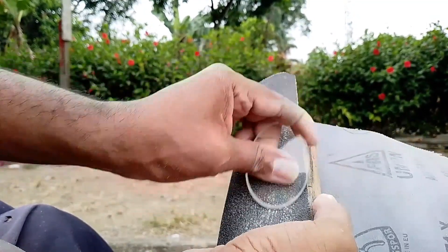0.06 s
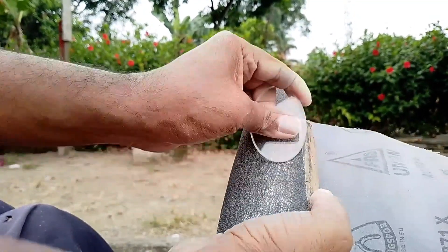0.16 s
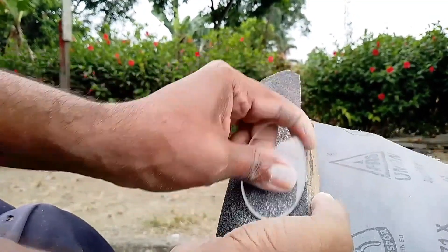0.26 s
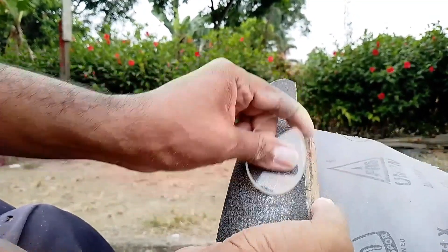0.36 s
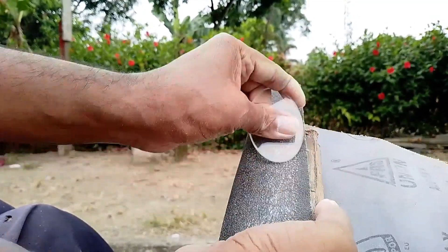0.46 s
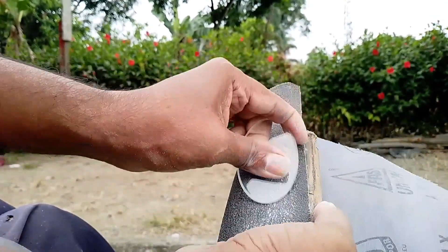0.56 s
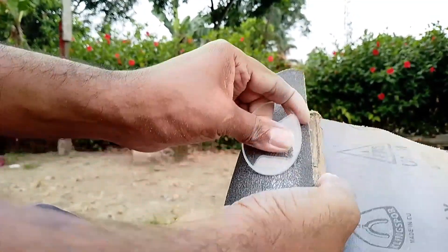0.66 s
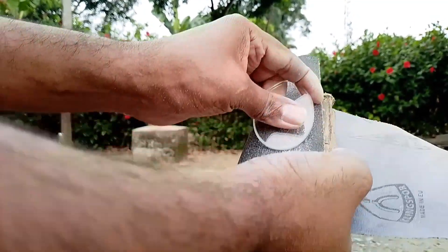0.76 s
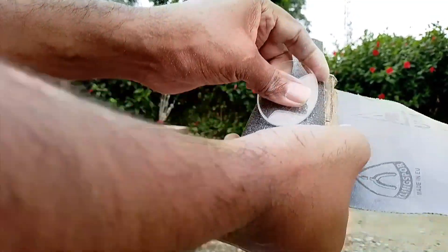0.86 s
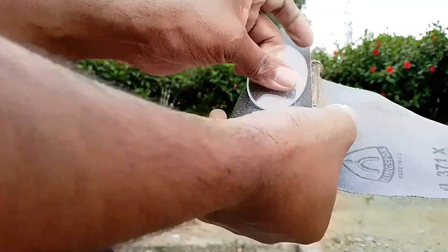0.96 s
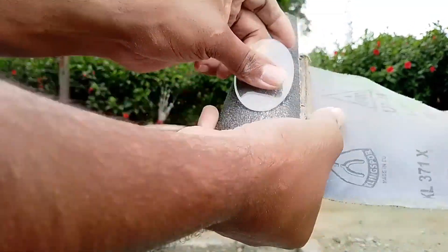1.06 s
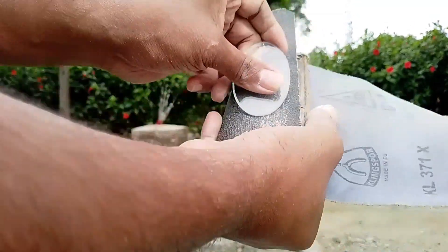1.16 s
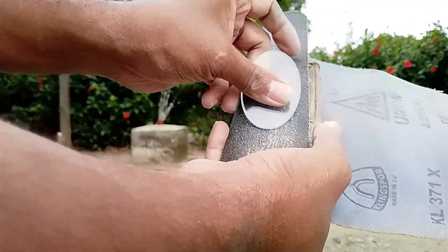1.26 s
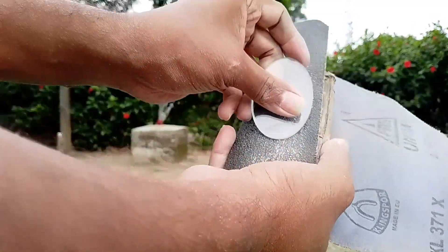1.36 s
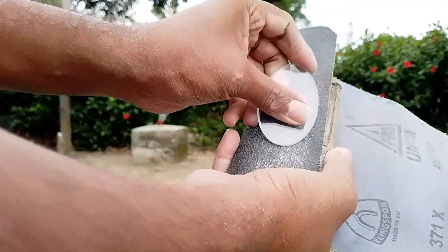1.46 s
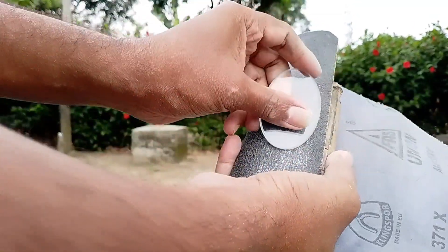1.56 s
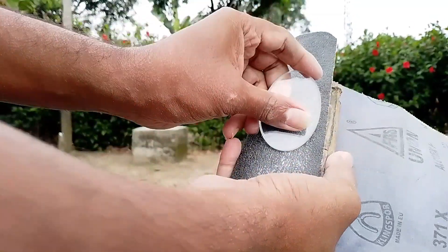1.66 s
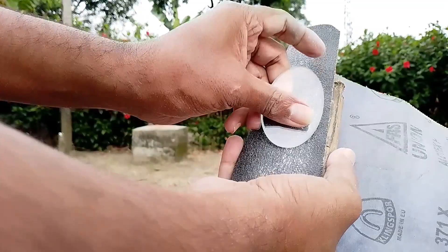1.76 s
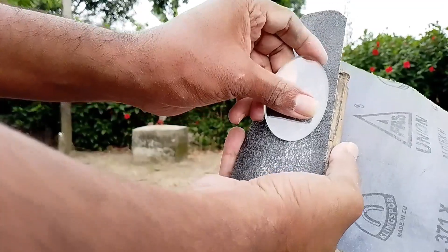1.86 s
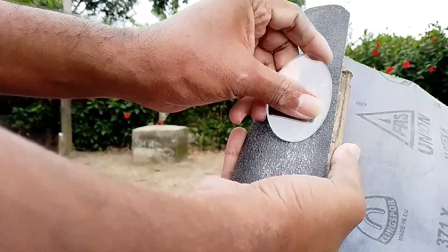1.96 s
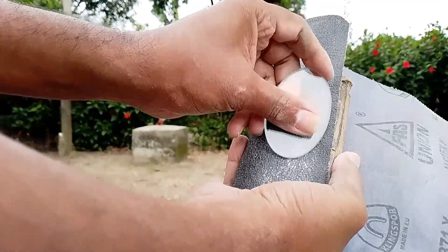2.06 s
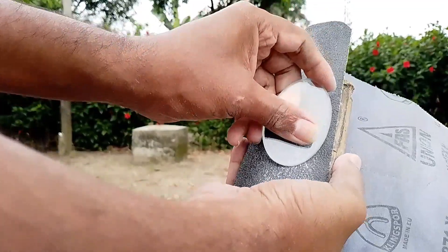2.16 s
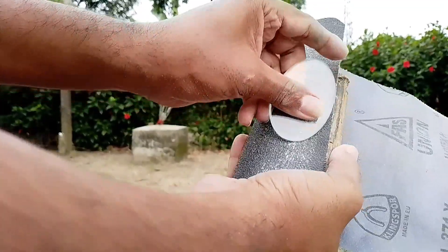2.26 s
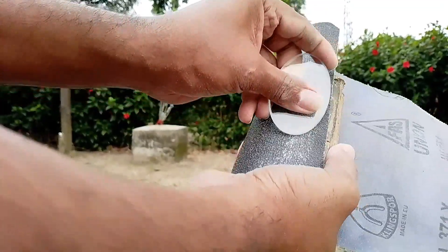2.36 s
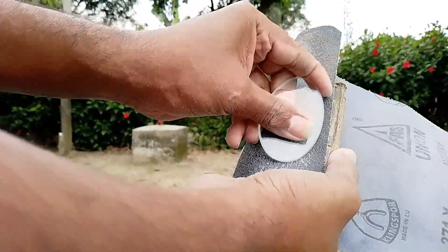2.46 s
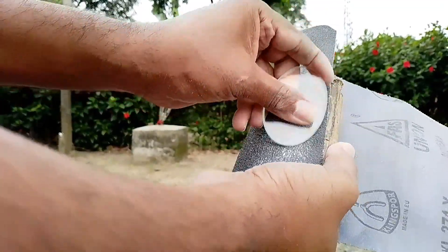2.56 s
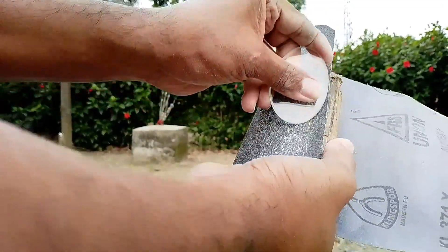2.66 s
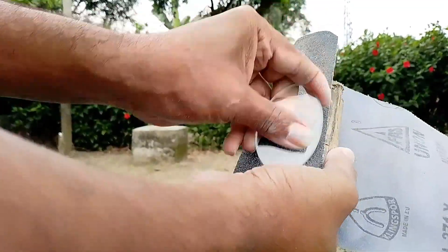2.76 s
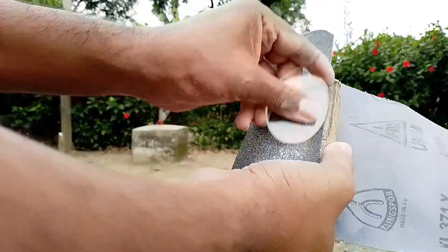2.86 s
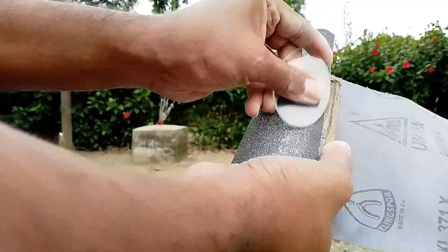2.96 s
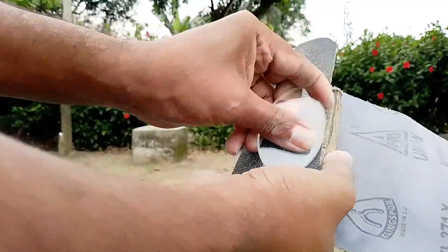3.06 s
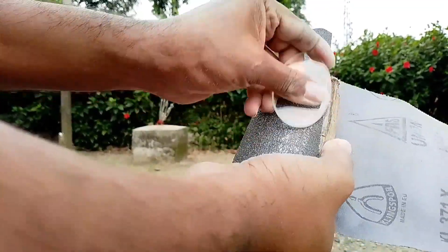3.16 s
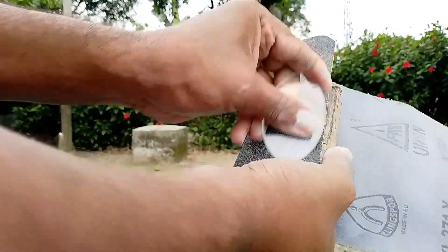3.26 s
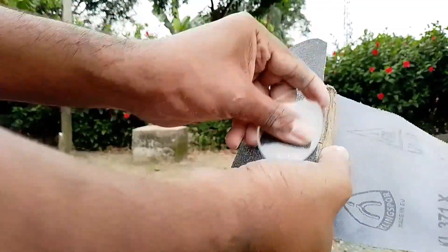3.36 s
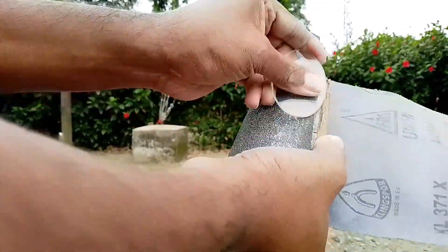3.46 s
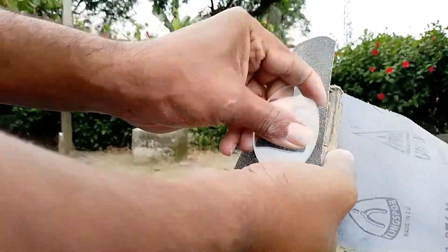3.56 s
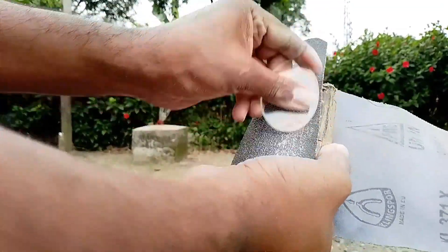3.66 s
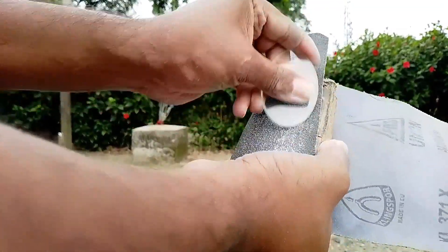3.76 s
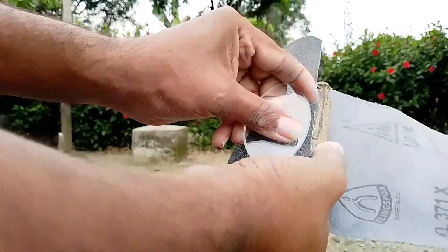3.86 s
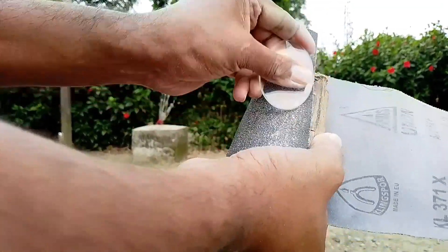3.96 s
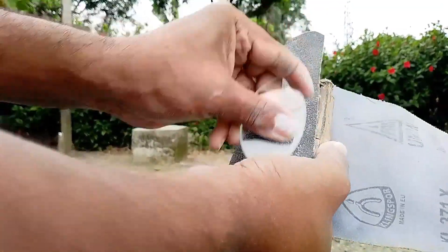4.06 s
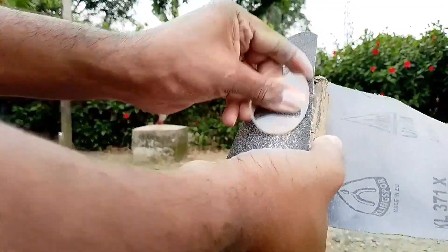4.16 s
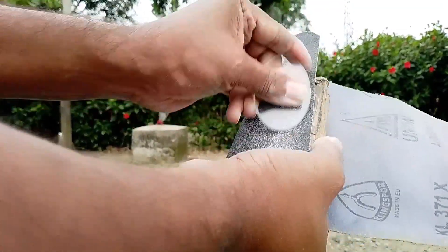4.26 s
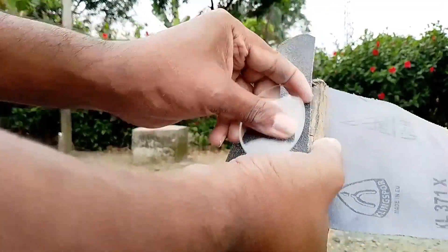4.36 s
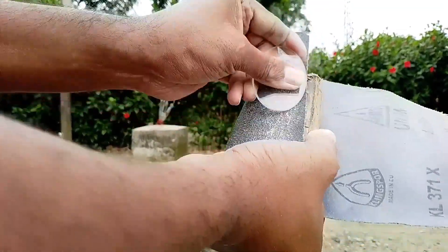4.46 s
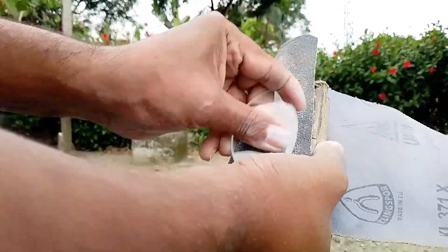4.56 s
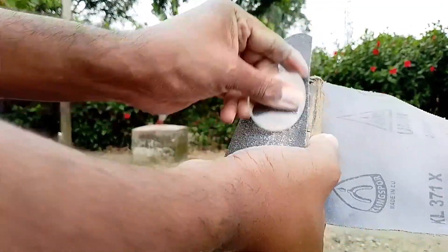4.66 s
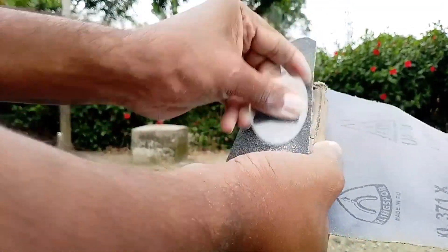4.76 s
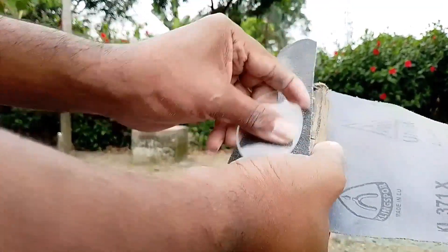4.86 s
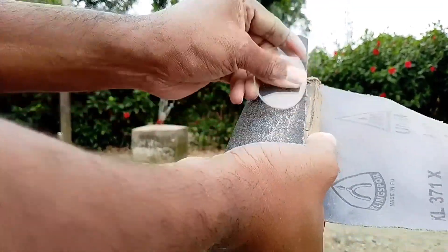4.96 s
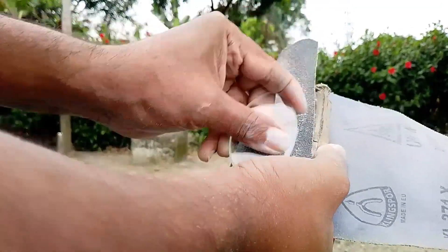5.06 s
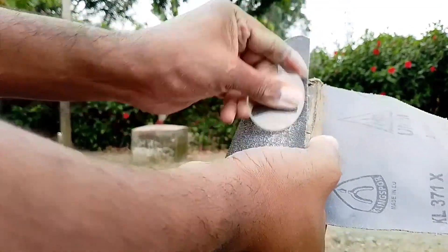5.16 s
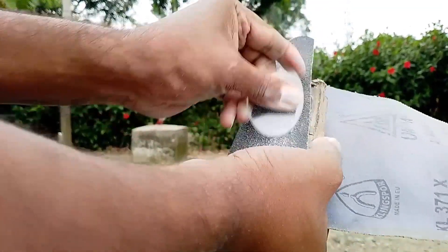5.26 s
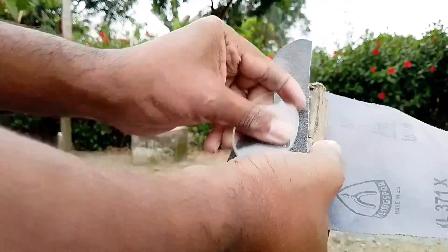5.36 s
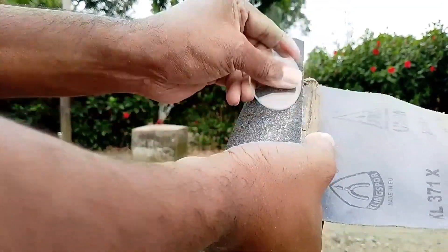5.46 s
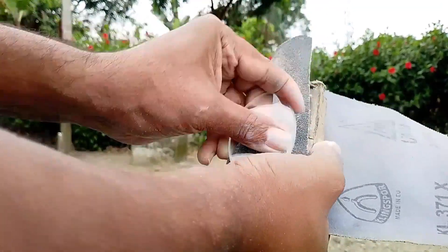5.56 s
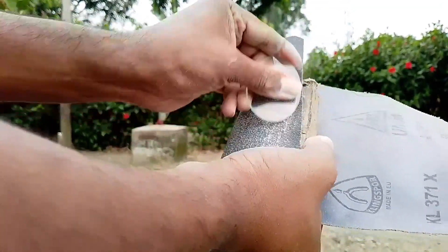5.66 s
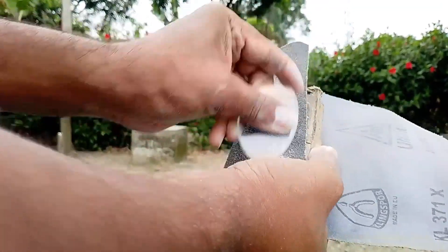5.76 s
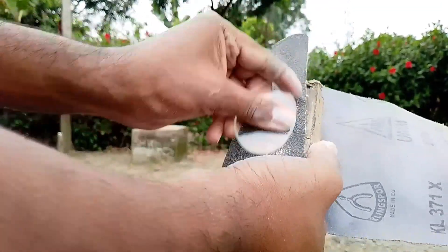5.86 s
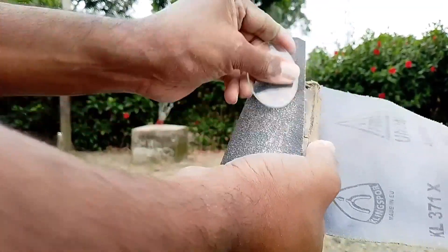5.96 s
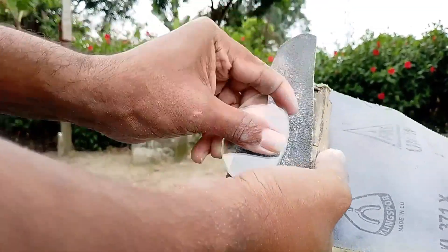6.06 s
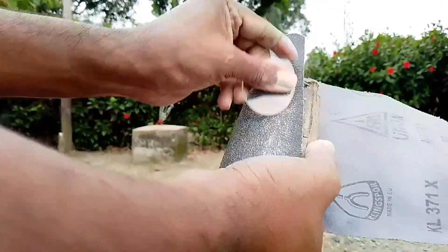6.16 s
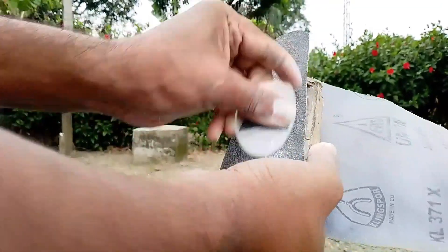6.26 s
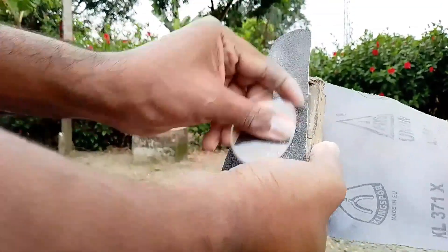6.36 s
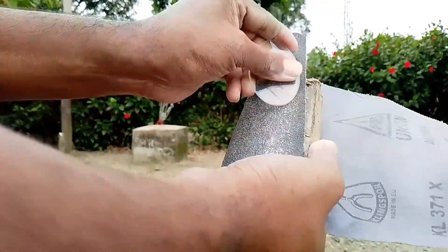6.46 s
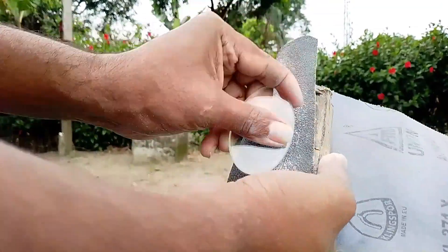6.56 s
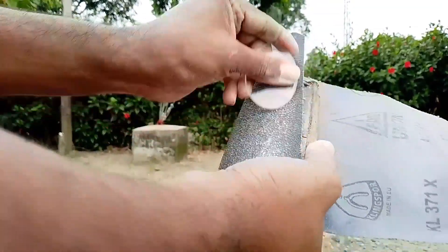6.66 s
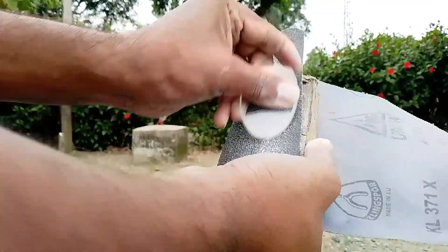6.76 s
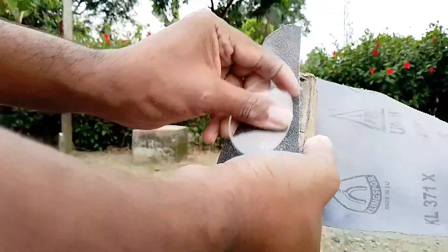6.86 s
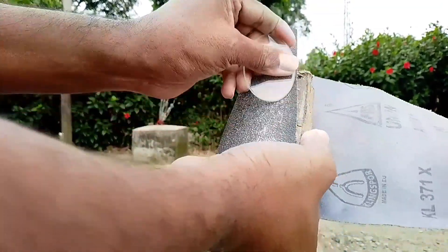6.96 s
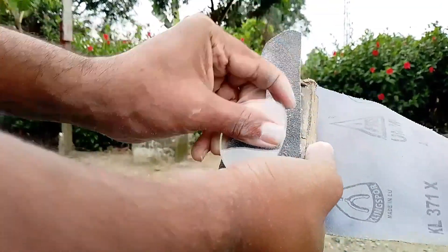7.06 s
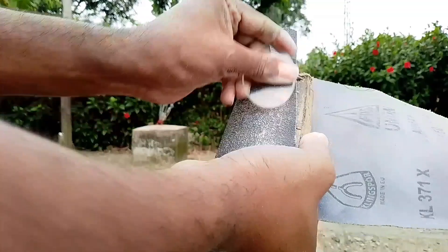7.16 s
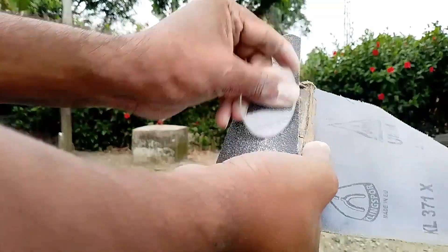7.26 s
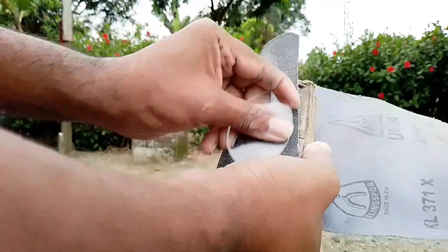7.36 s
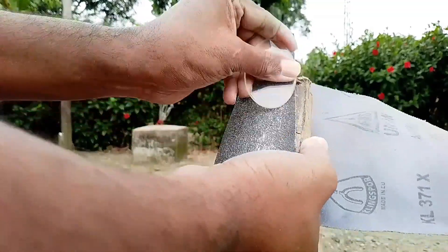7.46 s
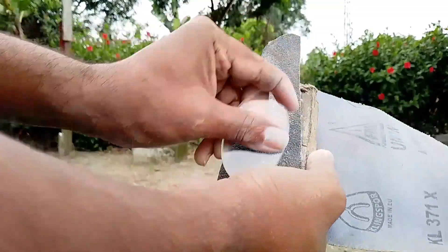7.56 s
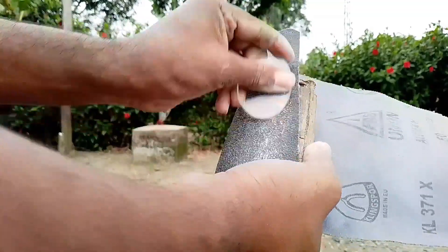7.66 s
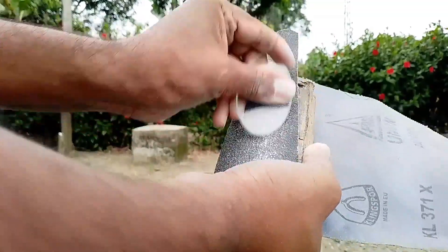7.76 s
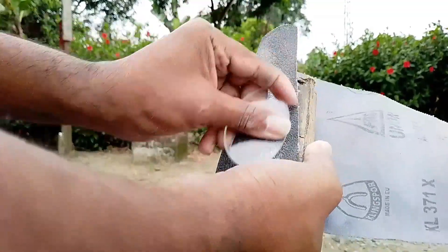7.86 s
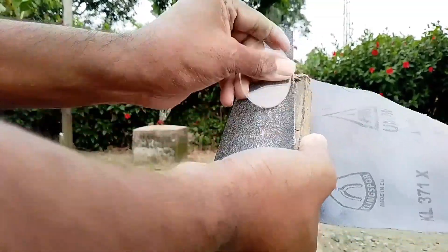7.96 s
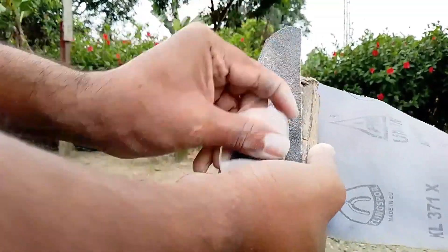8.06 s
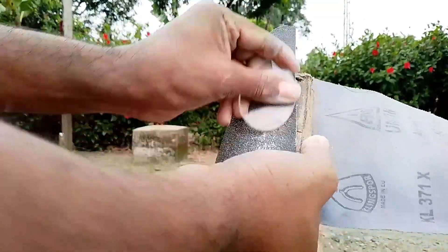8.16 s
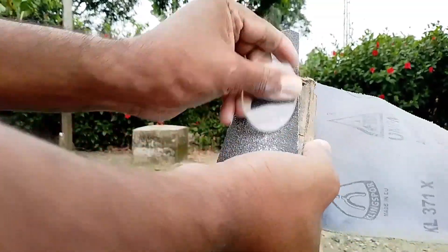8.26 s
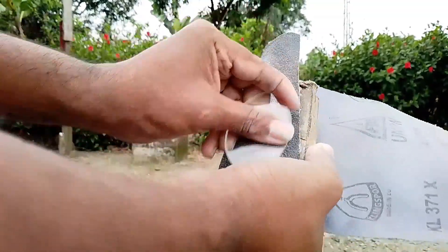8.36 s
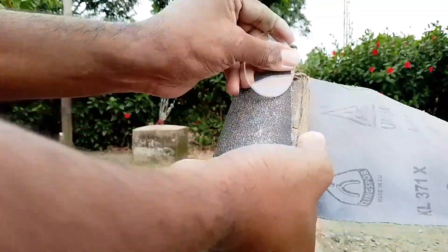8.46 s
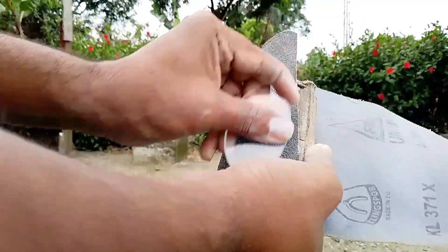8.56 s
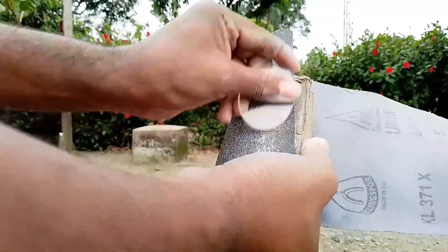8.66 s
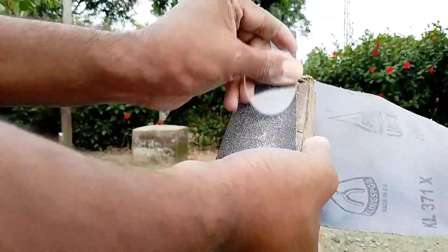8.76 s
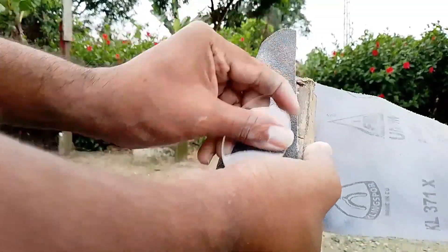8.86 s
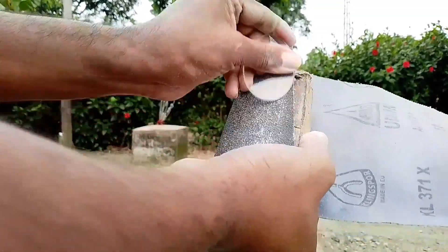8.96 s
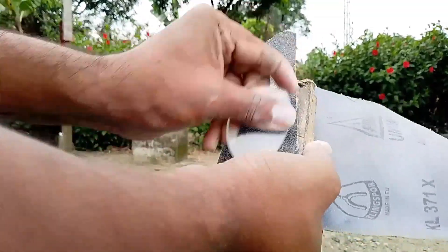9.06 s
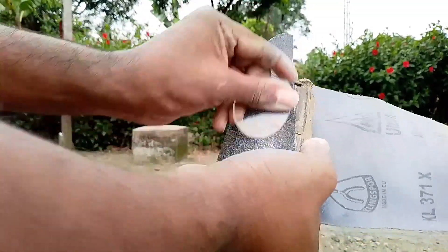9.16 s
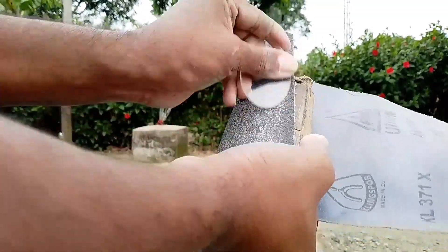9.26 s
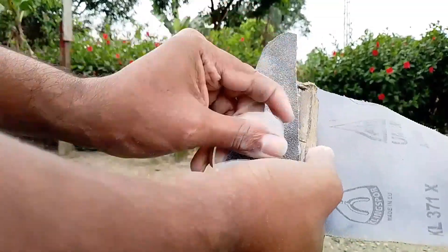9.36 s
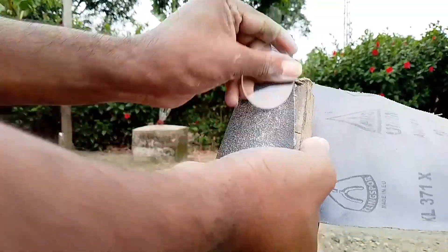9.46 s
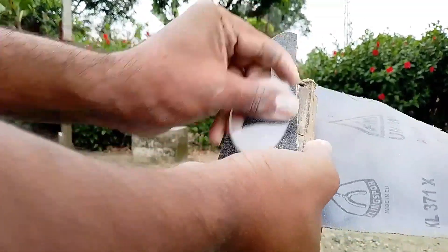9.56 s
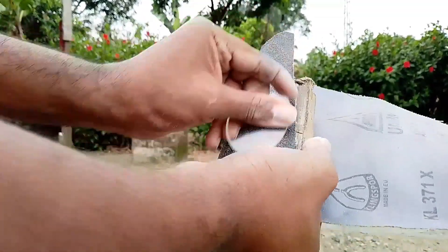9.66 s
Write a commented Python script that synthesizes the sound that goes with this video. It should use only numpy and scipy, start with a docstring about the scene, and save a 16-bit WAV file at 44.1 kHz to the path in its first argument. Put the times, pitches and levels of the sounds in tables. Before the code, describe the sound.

Outdoors, very close and dry. From 0 to about 0.63 s, a small glass disc makes five short gritty strokes on coarse sandpaper, each a dense rasp of roughly a tenth of a second, strongest in the mid and upper-mid range, with small gaps between. From 0.65 to 2.1 s the hand rests: faint scuffs of the disc, a soft low bump near 1.6 s, a light wind flutter, and distant birds with gliding whistles and a repeated fuzzy trilled note, lasting until about 2.8 s. Rubbing resumes weakly at 2.1 s, gains force by 2.75 s, then settles into quick, even to-and-fro strokes, about eight per second, with occasional dull grit snaps. The tone slowly brightens, while the level eases slightly towards the last stroke at 9.66 s and a tiny final touch. A low rumble, faint hum and thin high insect buzz lie underneath.

```python
"""A small glass disc is rubbed to and fro on coarse sandpaper on a wooden block, outdoors, near a phone.
From the start, grit clicks on the glass by the thousand and rings the resonances of disc, paper and block;
shaped noise makes the insect, light wind, low rumble and hum of the yard underneath.
After five strokes the hand rests: light touches of the disc are heard, a finger bump as a short low pulse,
and far birds as gliding or trilled sine tones. Then quick, even rubbing returns and lasts nearly to the end."""
import sys
import numpy as np
from scipy import signal
from scipy.fft import rfft, irfft
from scipy.io import wavfile
from scipy.ndimage import uniform_filter1d

SR = 44100
rng = np.random.default_rng(int(sys.argv[2]) if len(sys.argv) > 2 else 0)


def elevation(decibels):
    """Turn decibel levels (scalar or array-like) into linear amplitude ratios."""
    levels = np.asarray(decibels, float)
    return 10 ** (levels / 20)


def pcm_store(signal):
    """Save signal as 16-bit PCM."""
    levels = np.round(np.clip(np.atleast_2d(signal), -1, 1) * 32767)
    wavfile.write(sys.argv[1], SR, levels.astype(np.int16).T)


N = 427769
T = np.arange(N) / SR  # time in s


def evened(x):
    """Power normalisation: scales to rms 1."""
    return x / np.sqrt(np.mean(x ** 2) + 1e-20)


def ring(x, hz, width):
    """Resonance: a two-pole band-pass of peak gain 1, applied twice for steep skirts."""
    r = np.exp(-np.pi * width / SR)
    poles = [1, -2 * r * np.cos(2 * np.pi * hz / SR), r * r]
    zeros = (1 - r * r) / 2 * np.array([1, 0, -1])
    once = signal.lfilter(zeros, poles, x)
    return signal.lfilter(zeros, poles, once)


def drift(seconds):
    """Random modulation: smoothed noise of rms about 1 that wanders over the given time."""
    step = max(round(seconds * SR / 8), 1)
    rough = rng.standard_normal(N // step + 2)
    smooth = evened(uniform_filter1d(uniform_filter1d(rough, size=8), size=8))
    return np.interp(T, np.arange(len(rough)) * step / SR, smooth)


def coloured(points):
    """Spectral shaping: white noise weighted by (hz, relative db) points, then set to rms 1."""
    hz, db = np.transpose(points)
    f = np.fft.rfftfreq(N, 1 / SR)
    gain = elevation(np.interp(np.log(f + 1), np.log(hz + 1), db))
    return evened(irfft(rfft(rng.standard_normal(N)) * gain, N))


def nearby(x, level_db=-21, t60=0.07):
    """Diffuse reflection: scatter off ground and hedge as an exponentially decaying noise tail."""
    t = np.arange(round(.4 * SR)) / SR
    tail = ring(rng.standard_normal(len(t)), 2200, 11500) * elevation(-60 * t / t60) * (t > .003)
    return x + elevation(level_db) * signal.oaconvolve(x, tail / np.linalg.norm(tail))[:N]


# Strokes of the hand in two bouts; each bout begins with a pull, then push and pull alternate.
# start_s, length_s, pressure_db, lean_db (rise of pressure through the stroke),
# thumb_db (scales the lift of the low modes)
STROKE_TABLE = [(0.0, 0.055, -36, 3, 0.5), (0.097, 0.12, -36.5, -3, 0.0), (0.258, 0.096, -36.5, 1.5, 1.5),
                (0.387, 0.12, -37.5, 0.5, 1.5), (0.536, 0.095, -40.5, -1, 2), (2.091, 0.087, -44.5, 1.5, 2),
                (2.262, 0.11, -43.5, 0, 3), (2.448, 0.089, -41.5, -3, 3), (2.594, 0.11, -43, -7.5, 2),
                (2.75, 0.087, -37, 6.5, 2.0), (2.883, 0.095, -36.5, -3, 2), (3.013, 0.081, -34.5, 5.5, 3),
                (3.14, 0.1, -39.0, 4.5, 2.5), (3.286, 0.079, -36.5, -3.5, 2.5),
                (3.412, 0.1, -35.5, -4, 2.5), (3.546, 0.1, -37.5, -5, 2.5), (3.647, 0.12, -38.5, -0.5, 0.5),
                (3.803, 0.088, -35.5, 3, 0.5), (3.934, 0.097, -37.5, -1, 1.5),
                (4.06, 0.084, -37, -0.5, 1.5), (4.171, 0.098, -36.5, 4, -1), (4.303, 0.083, -38, -0.5, 1),
                (4.419, 0.099, -38, 4, 1.5), (4.548, 0.084, -38, 3.5, 1), (4.668, 0.095, -37, -1, 0.5),
                (4.791, 0.092, -37.5, -3, 2), (4.91, 0.11, -37, -1.5, -0.5), (5.04, 0.09, -36.5, 3.5, 0.5),
                (5.167, 0.1, -36.5, -2, 1), (5.29, 0.091, -38, 2.5, 0), (5.411, 0.098, -37.5, 2.5, 0),
                (5.535, 0.089, -38, 6, 0.5), (5.648, 0.1, -38.0, 2.5, 0), (5.775, 0.091, -38, 4, -1.0),
                (5.894, 0.1, -37, 2, 0.0), (6.019, 0.1, -38, 3.5, 0), (6.15, 0.1, -37, -5.5, -0.5),
                (6.271, 0.098, -37, 6, 1), (6.398, 0.11, -36, -2, 0), (6.527, 0.096, -37.5, 3.5, 0),
                (6.649, 0.1, -37.5, -1.5, -1), (6.774, 0.099, -37, -1.5, 0.5),
                (6.903, 0.11, -38.5, 0.5, -1), (7.032, 0.096, -39.5, 3, 1.5), (7.154, 0.11, -37, 4.5, -1.0),
                (7.278, 0.099, -37.5, 0, -0.5), (7.412, 0.11, -40, -2, 0), (7.547, 0.087, -38.5, 0, 0.5),
                (7.654, 0.11, -39, 2, 0), (7.781, 0.098, -37.5, 2.5, -1), (7.909, 0.1, -38.5, 1, 0),
                (8.034, 0.096, -38.5, 8, 0), (8.156, 0.11, -39, 5, 1.5), (8.293, 0.093, -39, 4, -0.5),
                (8.412, 0.106, -38.5, 5.5, -0.5), (8.543, 0.099, -39, 0.5, 0.5),
                (8.666, 0.11, -39.5, 3.5, 1), (8.797, 0.099, -38.5, 3, 1), (8.922, 0.11, -41, 0.5, 1.5),
                (9.057, 0.091, -39.5, -1.5, 0), (9.177, 0.1, -39.5, 6, 0), (9.307, 0.1, -39, 2.5, 1.5),
                (9.434, 0.11, -39, 1.5, 0), (9.565, 0.096, -39.5, 0.5, 0.5)]


def strokes():
    """Sliding friction: pressure as a gain, thumb and push in dB, place on the paper and share done (0-1)."""
    pause_s = .5  # a longer time between starts begins a new bout
    edge_db, edge_s = 7, 0.018  # the disc is slow at both ends: the rasp is down so far, fills in so fast
    catch_db, catch_s = 7.5, 0.0027  # the rim breaks loose, and stops, within a moment
    stick_db_per_s = 2598  # outside the stroke the glass sticks
    creep_db, creep_db_per_s, ragged_db = -31.5, 482, 5  # a faint, ragged creep is left
    push_grip_db, uneven_db = 0.35, 0.64  # pushes ring more in the middle; pressure wavers
    press, thumb_db, push_db, done = np.zeros((4, N))
    ragged = ragged_db * drift(0.0041)
    place, pull, last = np.full(N, .5), True, 0
    for start, length, db, lean_db, thumb in STROKE_TABLE:
        pull = start - last > pause_s or pull
        on = slice(max(round((start - .03) * SR), 0), round((start + length + .04) * SR))
        share = np.clip((T[on] - start) / length, 0, 1)
        from_start = T[on] - start if start else np.inf  # a stroke at 0 is already under way
        inside = np.minimum(from_start, start + length - T[on])  # s from the nearer end
        within, outside = np.maximum(inside, 0), np.maximum(-inside, 0)
        loss_db = edge_db * np.exp(-within / edge_s) + catch_db * np.exp(-within / catch_s)
        slide = elevation(-(loss_db + stick_db_per_s * outside))
        creep = elevation(creep_db - creep_db_per_s * outside + ragged[on])
        press[on] += elevation(db + lean_db * (share - .5)) * (slide + creep)
        thumb_db[on], done[on] = thumb, share
        push_db[on] = 0 if pull else push_grip_db
        place[on] = .5 - .5 * np.cos(np.pi * (share if pull else 1 - share))
        pull, last = not pull, start
    return press * elevation(uneven_db * drift(.02)), thumb_db, push_db, place, done


# The slowly changing hold.
# time_s, tilt_db (up lifts most modes from 2.7 kHz and thins those near 1 kHz),
# grip_db (lift of the middle modes),
# sweep_db (loss of the low modes from one end of the paper to the other); each mode scales these
HOLD_TABLE = [(0, -8, -1.5, 2.5), (.7, -4.5, -2, 2), (1.3, -16, -4, 0.1), (2, -11.5, 1.5, -0.5),
              (2.8, -6.5, 1.2, 8), (3.6, -6.5, 1.1, 4), (4.5, -4, 1.67, 7), (5.5, -3.5, 1.5, 6),
              (6.5, -3, 1, 0.5), (7.5, -2, 0, 3.5), (8.3, -1, 0.35, 7), (9, 0, 0, 4.5), (9.7, 0, -1.2, 4.5)]


def hand():
    """Contact mechanics: pressure gain, the hold's thumb, grip and tilt in dB, place and share done (0-1)."""
    grip_top, grip_bend_db = .42, 7  # middle modes ring most at this place (0-1), drop away from it
    press, thumb_db, push_db, place, done = strokes()
    nudges(press, thumb_db)
    lift_offs(press)
    s, *columns = np.transpose(HOLD_TABLE)
    tilt_db, grip_db, sweep_db = (np.interp(T, s, column) for column in columns)
    thumb_db = thumb_db - sweep_db * (place - .5)
    grip_db = grip_db + push_db - grip_bend_db * (place - grip_top) ** 2
    return press, thumb_db, grip_db, tilt_db, place, done


def palm(x, place, echo_db=-12, near_ms=1.103, travel_ms=0.474):
    """Comb filtering: an echo off the lower hand; its delay follows the disc, so bands sweep."""
    delay_s = (near_ms + travel_ms * place) / 1000
    return x + elevation(echo_db) * np.interp(T - delay_s, T, x)


# Modes of disc, paper and block.
# pitch_hz, width_hz (each of two resonance passes), level_db (relative),
# thumb_share, grip_share, tilt_share (factors on the dB of the hold)
MODES = [(250, 310, -23, 0.5, -1.2, 0.18), (437, 210, -21.5, 1.2, -0.5, 0.34),
         (523, 267, -16.5, 0.07, -1.2, 0.86), (792, 120, -18.5, 0, -1.5, -0.12),
         (1180, 410, -18.5, 0.1, -1.5, -0.9), (1404, 200, -7.5, 2.5, 0.3, 0.047),
         (1648, 660, -3, 1.08, 0.16, 0.66), (2220, 740, -10.5, -0.4, -1.2, -0.1),
         (2700, 930, 0, 0.3, 2.35, 0.9), (3060, 440, -6, 0.07, 4, 1), (3600, 623, 3.5, 0, -0.13, 0.61),
         (3998, 624, -2, 0.23, 0.1, 0.35), (4744, 600, -7, 1.06, 0.35, 1),
         (5386, 550, -11.5, 0.24, -0.4, 1), (6610, 800, -22.5, -0.5, -1.2, 0.16),
         (7700, 1800, -29, 0.45, -0.3, -0.27), (8800, 260, -26, 0, 1.7, 0.11),
         (9570, 1560, -19.5, 1.13, -0.9, 1), (10930, 1300, -21, -0.1, 0.2, 1),
         (12050, 1300, -21.5, 0, 2.5, 1)]
# Large grains that snap under the rim.
# start_s, level_db (of the snap, before snap_gain_db), treble_db (against the level)
SNAP_TABLE = [(0.109, -21, -18), (0.307, -35, -28), (0.3858, -25.5, -9), (0.4499, -21, -37),
              (2.8138, -27, -27), (2.8787, -35, -6), (3.098, -37, -8), (3.4375, -15.5, -30),
              (3.512, -27, -19), (3.5846, -24, -27), (3.7408, -23, -28), (4.1715, -29, 0),
              (4.1893, -19.5, -34), (4.2157, -28, -30), (4.495, -32, -32), (4.7127, -20, -30),
              (4.9576, -27, -30), (5.1862, -20.5, -32), (6.2125, -25, -30), (6.463, -22, -31),
              (6.597, -33, -30), (6.6987, -21, -28), (7.0346, -32, -24), (7.6004, -20, -32),
              (7.8335, -18.5, -31), (7.974, -35, -30), (8.032, -33, -17), (8.115, -19, -31),
              (8.1766, -22, -27), (8.245, -26, -29), (8.349, -21.5, -36), (8.561, -31.5, -26),
              (8.8859, -19, -29), (9.192, -30, -11)]


def rasp(grains_per_s=14000, spread_db=3.0, clump_db=1.58, patch_db=1.75, dulling=0.39, clogging_db=3,
         shimmer_db=2.0, usual_treble_db=-22, snap_gain_db=-9.5):
    """Modal excitation: each grain is a click that meets every mode with a random sign."""
    press, thumb_db, grip_db, tilt_db, place, done = hand()
    hits = rng.random(N) < grains_per_s / SR
    size = elevation(spread_db * np.minimum(rng.exponential(1, N), 5.5)) * hits
    grit = press * evened(size * elevation(clump_db * drift(.0015)))  # grains come in clumps of a few ms
    lightness_db = np.clip(-40 - 20 * np.log10(press + 1e-6), -5, 20)
    # light contact is duller; dust gathers under the rim through each stroke
    dull_db = dulling * lightness_db + clogging_db * done
    # a snap is a noise burst of a few ms; snap_gain_db is the overall level of the snaps
    u = np.arange(300) / 24
    burst = u * np.exp(1 - u) * rng.standard_normal((len(SNAP_TABLE), 300))
    out, unit = np.zeros(N), 0
    for hz, width, db, thumb, grip, tilt in MODES:
        top = np.clip((hz - 4500) / 2000, 0, 1)  # 0 for low modes, 1 for the treble
        mode_db = thumb * thumb_db + grip * grip_db + tilt * tilt_db + patch_db * drift(.015)
        # the short top modes come and go as the rim rocks
        treble_change_db = top * (shimmer_db * drift(0.065) - dull_db)
        drive = grit * np.sign(rng.random(N) - .5) * elevation(mode_db + treble_change_db)
        for (at, level_db, treble_db), crack in zip(SNAP_TABLE, burst):
            snap_db = level_db + top * (treble_db - usual_treble_db) + snap_gain_db
            drive[round(at * SR):][:len(crack)] += elevation(snap_db) * crack
        out += elevation(db) * ring(drive, hz, width)
        unit += elevation(2 * db) * width * np.pi / 2 / SR  # power that this mode passes of white drive
    return palm(out / np.sqrt(unit), place)


def insect():
    """Narrow-band noise: a resonance on white noise gives a wavering buzz."""
    pitch_hz, width_hz, level_db = 6300, 310, -94.5
    buzz = evened(ring(rng.standard_normal(N), pitch_hz, width_hz))
    return elevation(level_db + 1.3 * drift(0.065)) * buzz


# Wind strength. time_s, level_db
WIND_TABLE = [(0, -79), (.16, -84), (.45, -74), (.83, -76), (1.11, -86), (1.67, -74), (2.27, -87),
              (3.2, -89), (3.67, -83), (3.86, -87), (5.11, -91), (6.89, -89), (7.08, -81), (7.38, -87),
              (8.43, -90), (9.7, -87)]


def wind():
    """Turbulence: lumpy pressure on the microphone port, as noise mostly under 80 Hz."""
    db = np.interp(T, *np.transpose(WIND_TABLE)) + 3.5 * drift(0.031)
    return elevation(db) * coloured([(10, -10), (25, 0), (45, -1), (60, -6), (80, -24), (300, -50)])


# Strength of the rumble. time_s, level_db
RUMBLE_TABLE = [(0, -74), (1.8, -76.5), (3.3, -71.5), (5.3, -75), (7, -71.5), (9.7, -75)]


def rumble():
    """Low-frequency transmission: lumpy noise of far traffic and of the hands through the phone."""
    db = np.interp(T, *np.transpose(RUMBLE_TABLE)) + 0.61 * drift(0.026)
    spectrum = [(40, -33), (75, -12.5), (110, -5.0), (160, 2), (220, 1.0), (280, -4), (500, -27.5)]
    return elevation(db) * coloured(spectrum)


# Spectrum of the yard's hum. pitch_hz, level_db (relative density per Hz)
YARD_SPECTRUM = [(150, -50), (250, 1.5), (920, -4.5), (1260, -5.5), (2100, -7.5), (2280, -3.5), (3170, -11),
                 (3680, -2.5), (5740, -18.5), (6230, -24), (7850, -40), (12000, -33), (12900, -27),
                 (16700, -57), (22000, -120)]


def yard(level_db=-76.5):
    """Ambient noise floor: steady shaped noise with a slight waver in level."""
    return elevation(level_db + 0.24 * drift(0.032)) * coloured(YARD_SPECTRUM)


# A finger bumps the phone. start_s, level_db (peak), pitch_hz
THUMP_TABLE = [(0.619, -55, 170), (1.635, -45, 172), (3.589, -54, 171), (7.599, -54, 178),
               (7.779, -57, 172)]


def thumps():
    """Damped impulse response: about one and a half slow cycles under a bell-shaped envelope."""
    out = np.zeros(N)
    for s, db, hz in THUMP_TABLE:
        u = (T - s - .004) * hz  # cycles from the middle of the bump
        out -= elevation(db) * np.cos(2 * np.pi * u) * np.exp(-(u / 0.56) ** 2)
    return out


# Light touches of the disc: small shifts in the rest, and one more at the very end.
# top_s, rise_s, fall_s, pressure_db, thumb_db (scales the lift of the low modes)
NUDGE_TABLE = [(.66, 0.029, .05, -69, 3.5), (.945, .05, 0.025, -62, 2), (.98, 0.021, 0.087, -77, 2),
               (1.271, 0.021, 0.027, -58, 3), (1.612, .012, .018, -69, 3.5), (1.822, .012, .012, -63, 1),
               (1.847, .012, 0.011, -63, 0), (2.003, 0.016, 0.012, -68, 2.5), (9.7, 0.024, .01, -49, 4)]


def nudges(press, thumb_db, edge_db=20):
    """Brief friction: adds bell-shaped pressure in place, edge_db down at the ends of rise and fall."""
    for top, rise, fall, db, thumb in NUDGE_TABLE:
        on = slice(round((top - 2 * rise) * SR), round((top + 2 * fall) * SR))
        away = np.maximum((top - T[on]) / rise, (T[on] - top) / fall)
        press[on] += elevation(db - edge_db * away ** 2)
        thumb_db[on] = thumb


# A far caller repeats a trilled note near 2.3 kHz, with one short lower note at 1.8 kHz. start_s, length_s,
# pitch_hz, level_db (before trill and fade)
CALLER_TABLE = [(.745, 0.38, 2330, -81.5), (1.037, .16, 2290, -82), (1.337, 0.15, 2260, -79),
                (1.654, .15, 2300, -83), (1.989, 0.17, 2260, -84), (2.33, 0.16, 2350, -76),
                (2.665, 0.14, 2360, -76), (.93, 0.08, 1800, -76)]


def caller(trills_per_s=18, fade_db_per_s=35):
    """Amplitude and phase modulation: a fuzzy, trilled whistle that fades through each repeat."""
    out, waver = np.zeros(N), 1.35 * drift(0.0097)
    for s, length, hz, db in CALLER_TABLE:
        t = np.arange(round(length * SR)) / SR
        on = slice(round(s * SR), round(s * SR) + len(t))
        trill = 0.85 + 0.24 * np.cos(2 * np.pi * trills_per_s * (t - .025))
        shape = elevation(db - fade_db_per_s * t) * trill * signal.windows.tukey(len(t), .25)
        out[on] += 2 * shape * np.sin(2 * np.pi * hz * t + waver[on])
    return out


# Glides of the birds, one table a note.
# time_s, pitch_hz, level_db, upper_db (of the second partial); levels before the waver
BIRD_NOTES = [
    [(.755, 3200, -91, -97), (.78, 3580, -74, -88), (.82, 3600, -86, -100), (.88, 3600, -93, -99)],
    [(1.095, 3480, -78, -90), (1.115, 3750, -67, -82), (1.14, 3450, -79, -88), (1.15, 3650, -90, -99),
     (1.19, 3650, -90, -99)],
    [(1.395, 5100, -86, -120), (1.41, 5150, -84, -120), (1.44, 4750, -88, -120), (1.47, 5330, -83, -120),
     (1.5, 5280, -81, -120), (1.53, 4600, -72, -120)],
    [(1.425, 4160, -84, -120), (1.44, 3300, -72, -120), (1.46, 4020, -76, -120), (1.5, 3600, -84, -120),
     (1.54, 3540, -78, -120), (1.56, 2900, -84, -120), (1.585, 2450, -83, -120)],
    [(1.595, 3930, -73, -120), (1.615, 3240, -80, -120), (1.63, 3300, -90, -120)],
    [(1.78, 3700, -86, -120), (1.83, 3690, -82, -120), (1.9, 3750, -87, -120)],
]


def birds():
    """Frequency modulation: gliding whistles, the first two with a fainter second partial, a little rough."""
    partial = 4 / 3  # second partial over the first
    out, blur = np.zeros(N), .5 * drift(.004)  # moving air scatters the phase
    for rows in BIRD_NOTES:
        s, hz, db, upper_db = np.transpose(rows)
        on = slice(round(s[0] * SR), round(s[-1] * SR))
        glide_hz = uniform_filter1d(np.interp(T[on], s, hz), 300)
        turn = 2 * np.pi * np.cumsum(glide_hz) / SR + blur[on]
        lower = elevation(np.interp(T[on], s, db)) * np.sin(turn)
        upper = elevation(np.interp(T[on], s, upper_db)) * np.sin(partial * turn)
        out[on] += (lower + upper) * signal.windows.tukey(len(turn), .15)
    return out * elevation(2.2 * drift(.008)) * np.sqrt(2)  # a sine's peak is sqrt(2) times its rms


# The disc lifts off for a moment. middle_s, half_length_s, level_db (change at the middle)
SKIP_TABLE = [(3.631, 0.0034, -20), (3.65, 0.0022, -25)]


def lift_offs(press):
    """Loss of contact: dips the pressure gain in place for a few ms."""
    for s, half, db in SKIP_TABLE:
        press *= elevation(db * np.exp(-((T - s) / half) ** 4))


def scene():
    """Superposition: all sources add at the microphone."""
    far = nearby(birds() + caller(), level_db=-7.0, t60=0.35)
    return (nearby(rasp()) + far + insect() + wind() + rumble() + thumps() + yard())[None]


def roll_off(x):
    """The treble ends steeply here."""
    return signal.sosfilt(signal.butter(12, 13020, fs=SR, output="sos"), x)


def record(dry):
    """Band limiting: a linear-phase low-pass removes the highest treble."""
    edge_hz = 12760
    low_pass = signal.firwin(511, edge_hz, window=("kaiser", 9), fs=SR)
    mix = signal.oaconvolve(dry, low_pass[None], "same")
    return roll_off(mix)


dry = scene()
out = record(dry)
pcm_store(out)
```